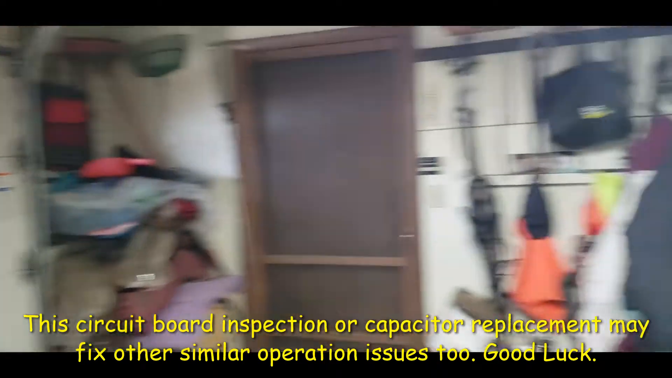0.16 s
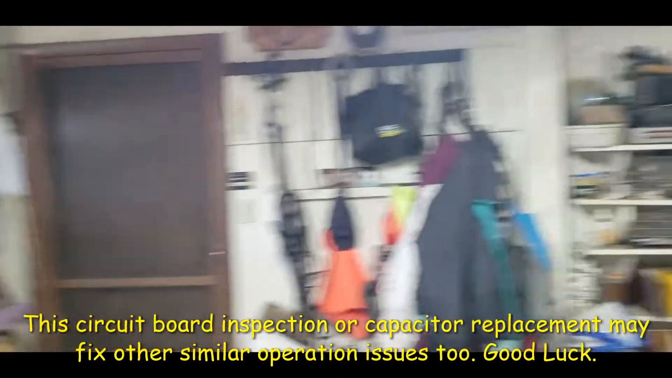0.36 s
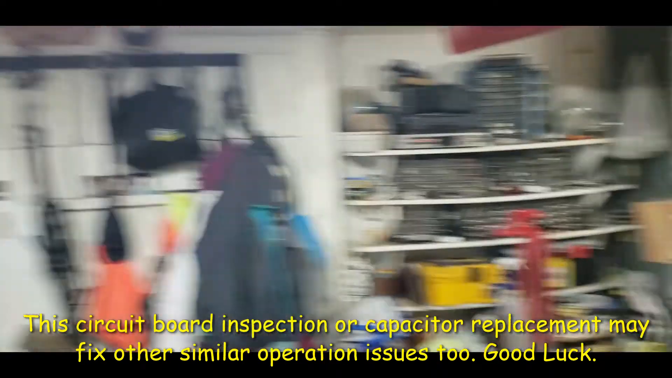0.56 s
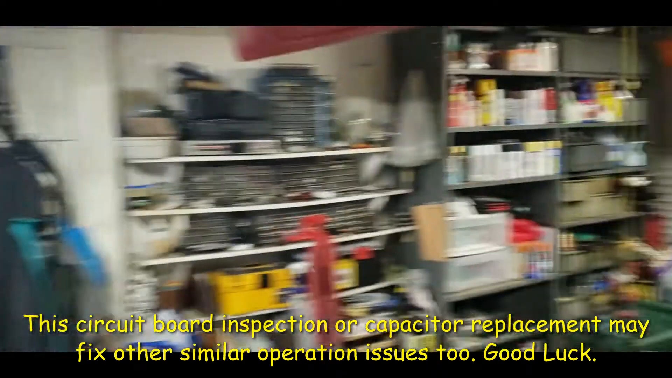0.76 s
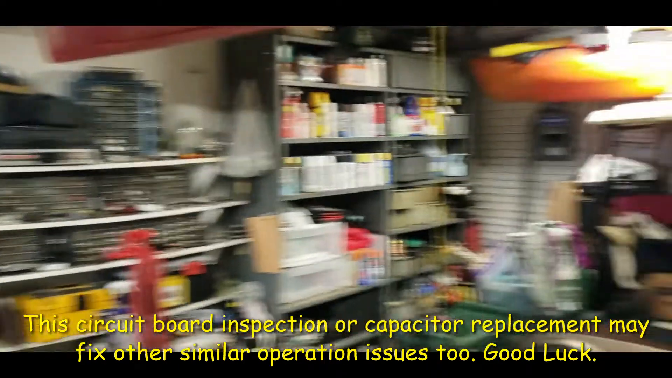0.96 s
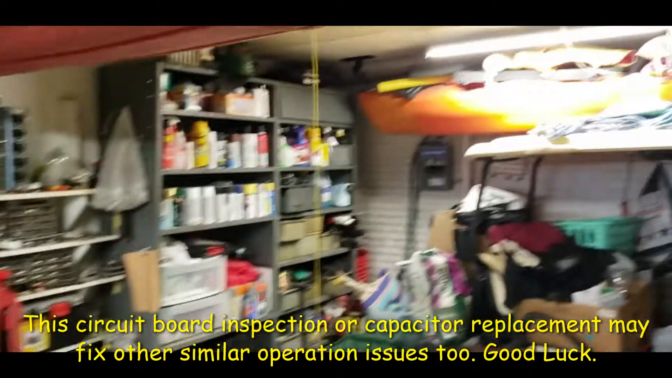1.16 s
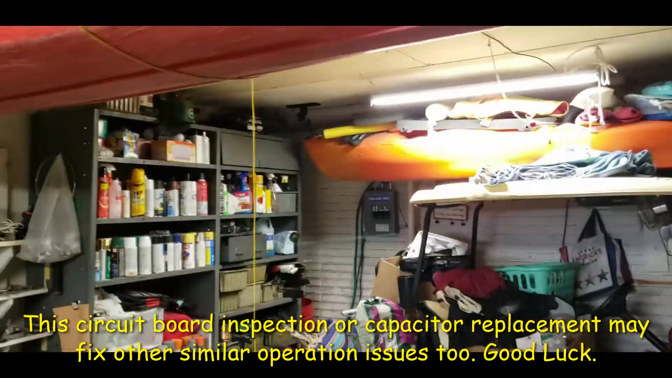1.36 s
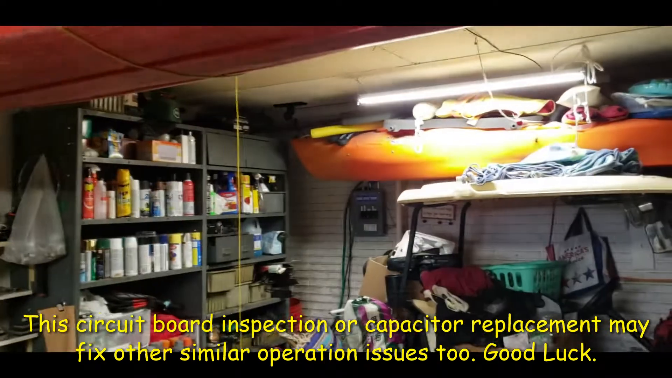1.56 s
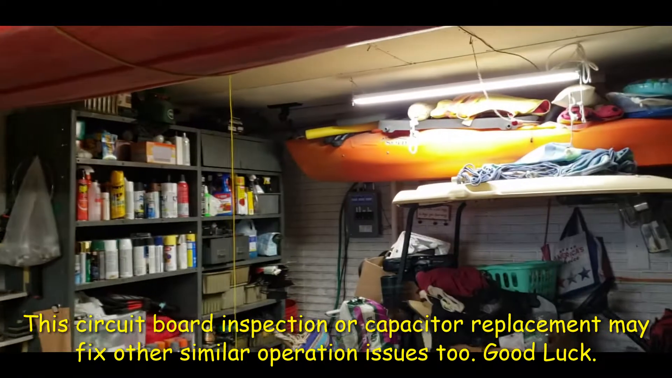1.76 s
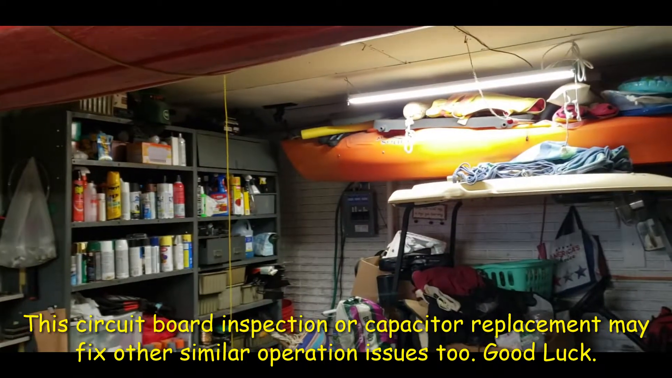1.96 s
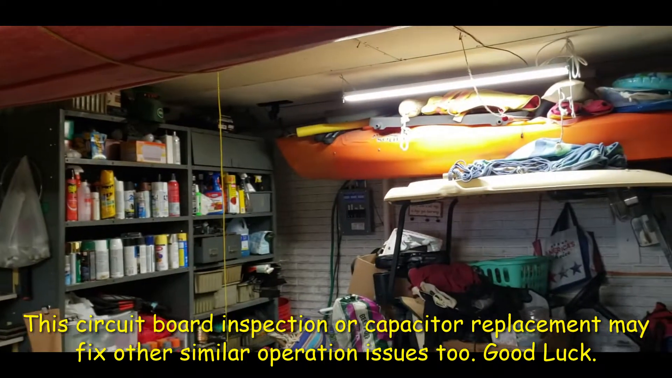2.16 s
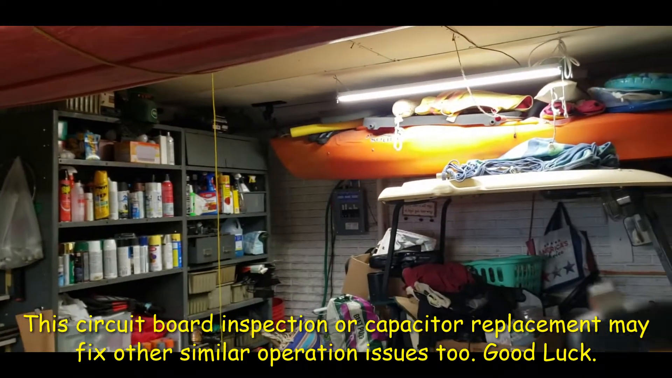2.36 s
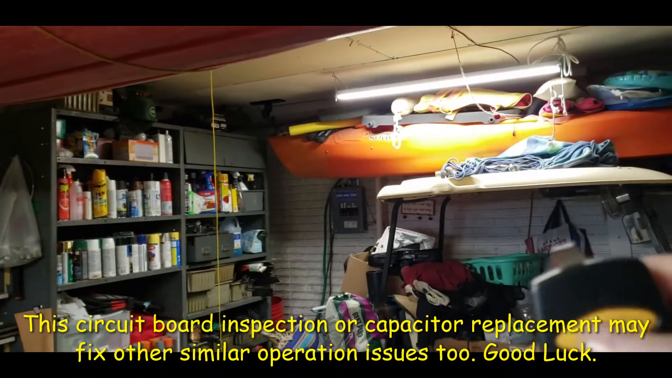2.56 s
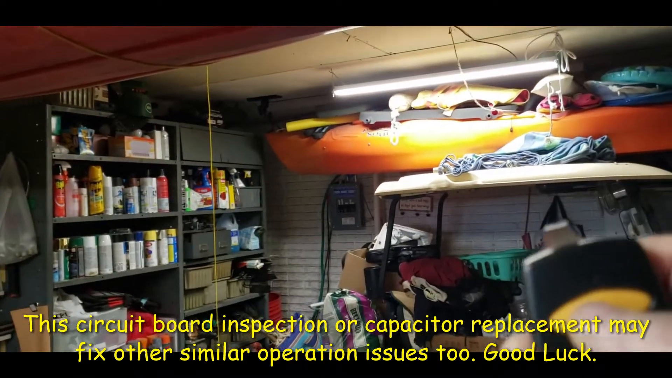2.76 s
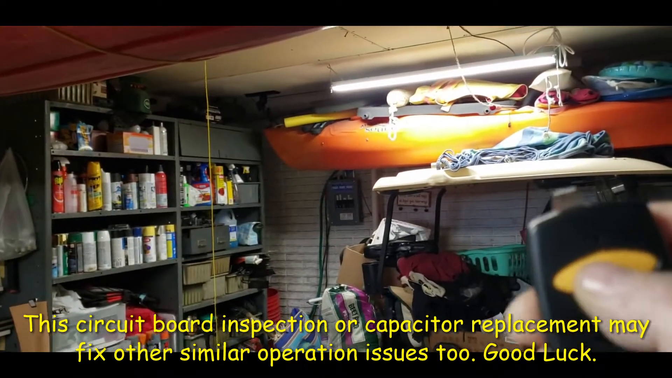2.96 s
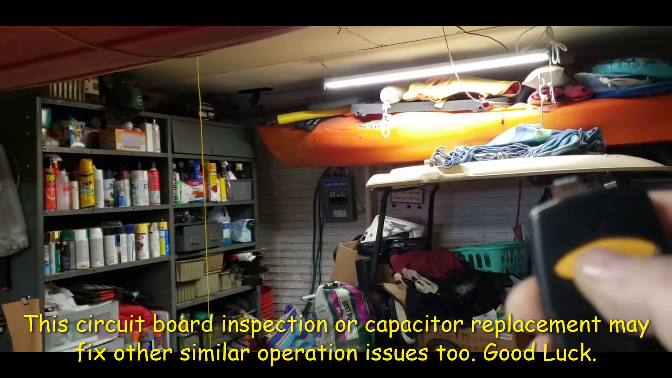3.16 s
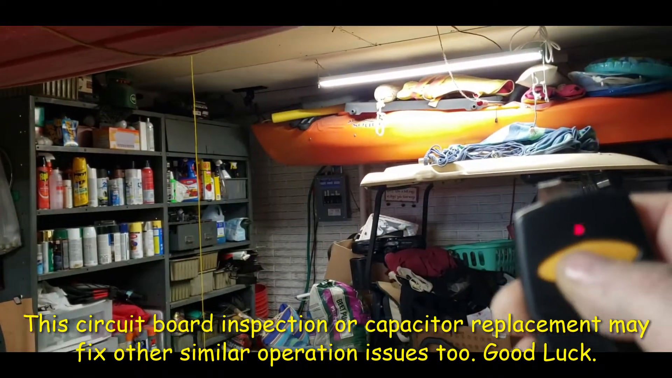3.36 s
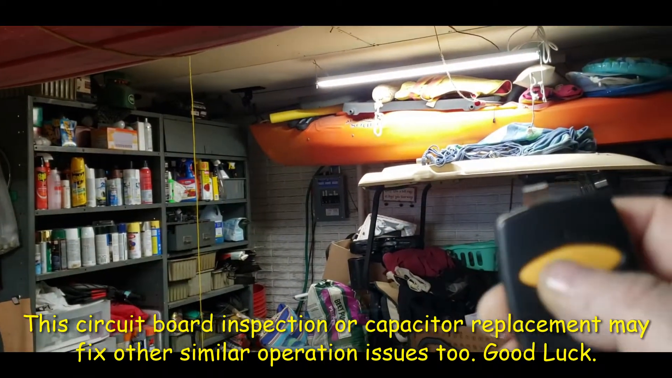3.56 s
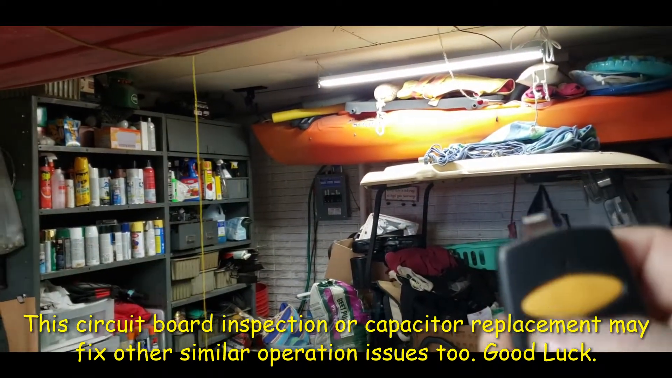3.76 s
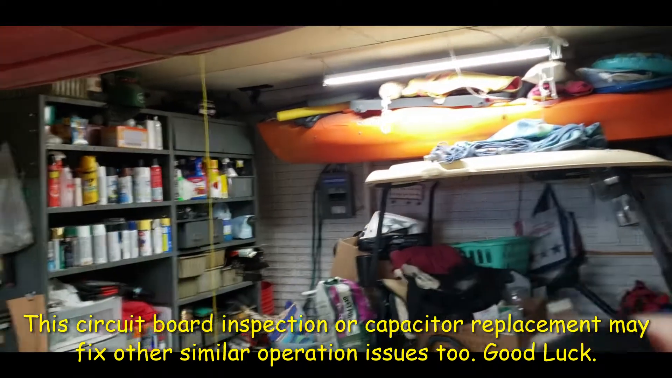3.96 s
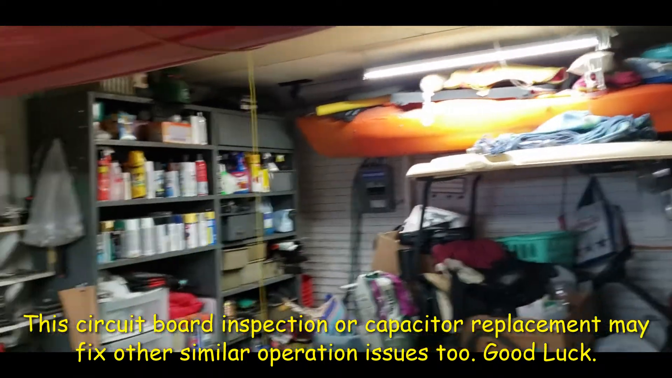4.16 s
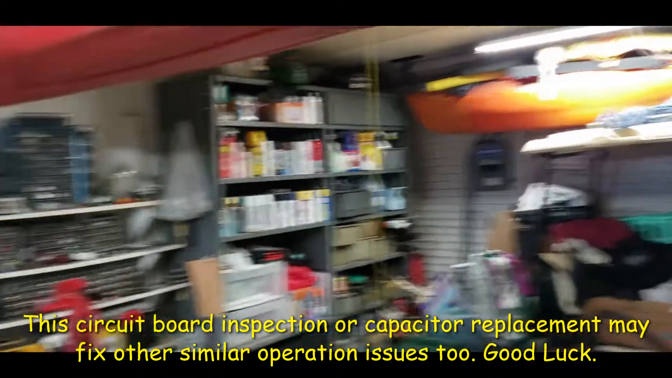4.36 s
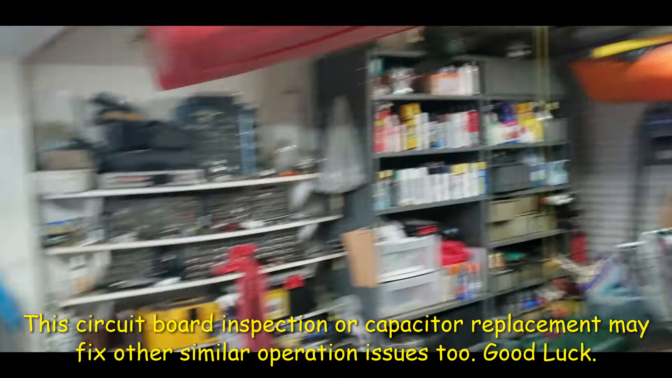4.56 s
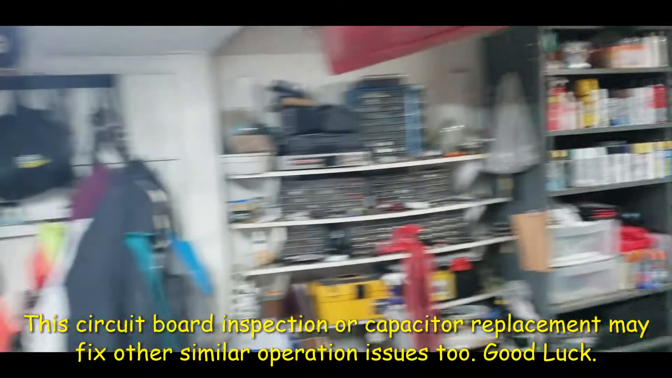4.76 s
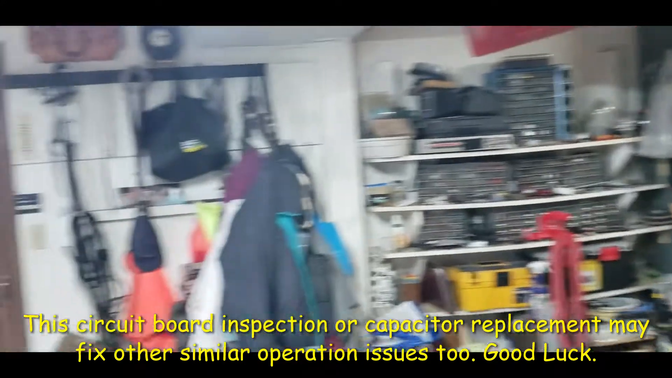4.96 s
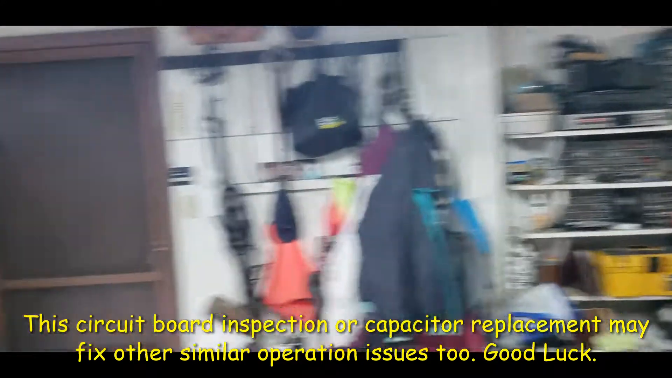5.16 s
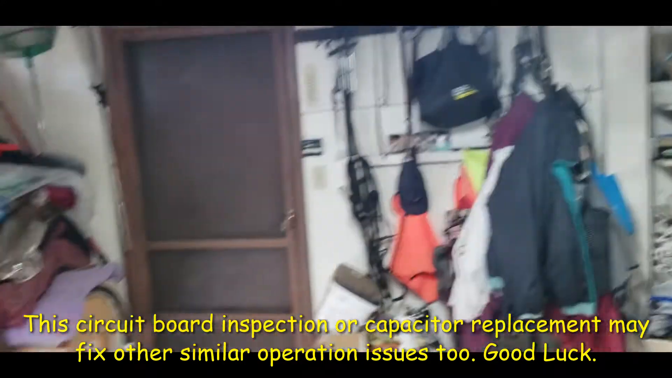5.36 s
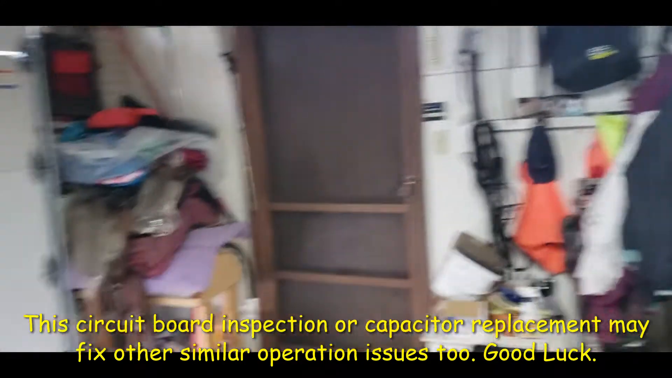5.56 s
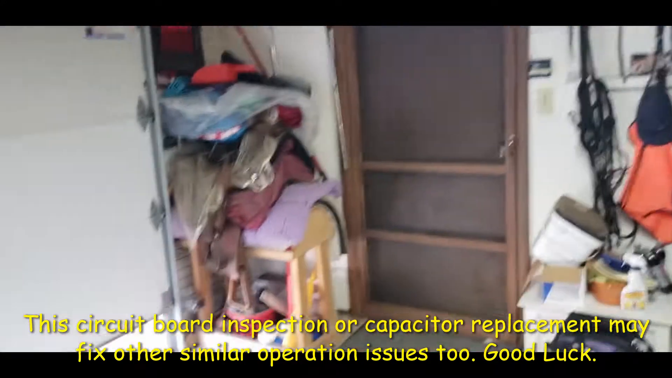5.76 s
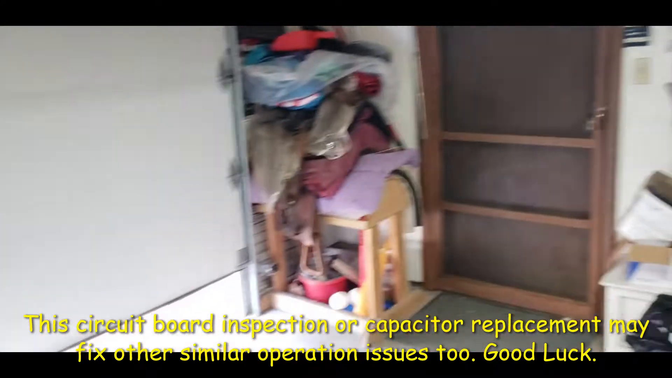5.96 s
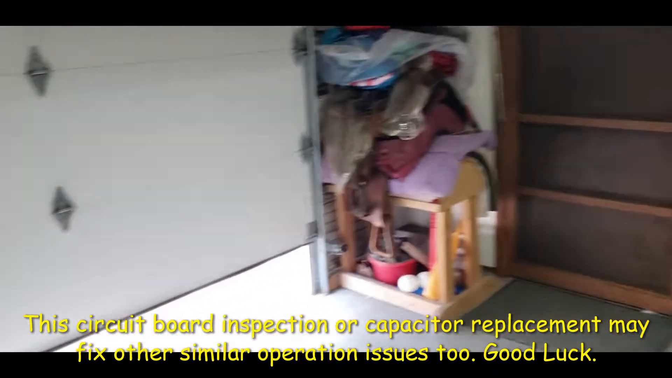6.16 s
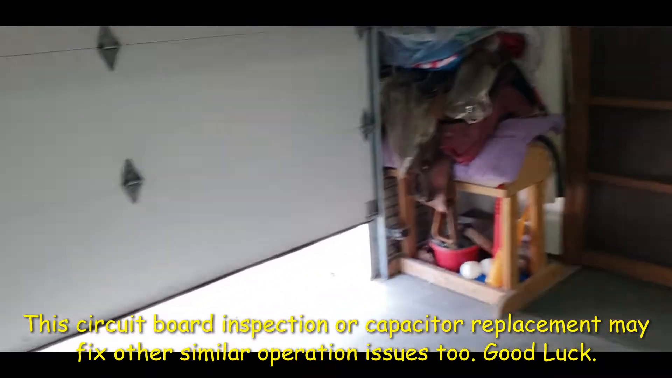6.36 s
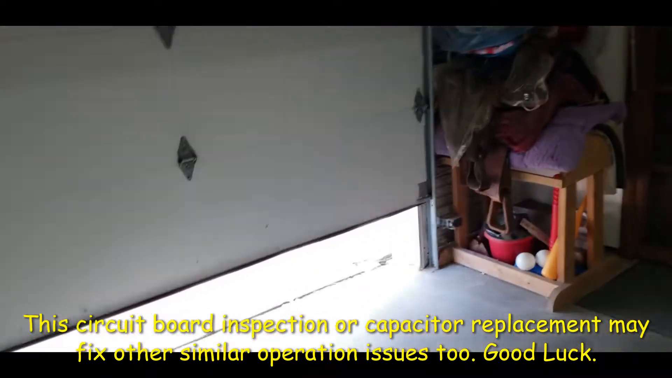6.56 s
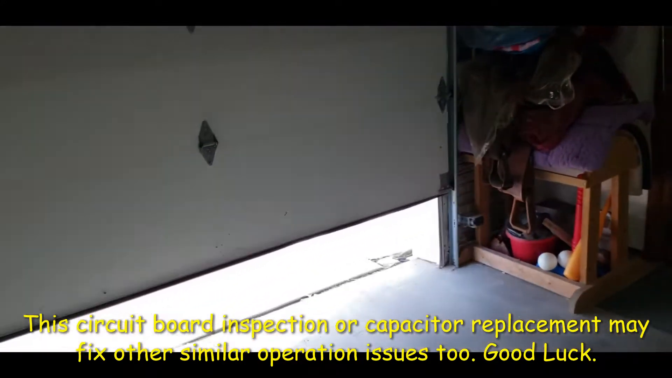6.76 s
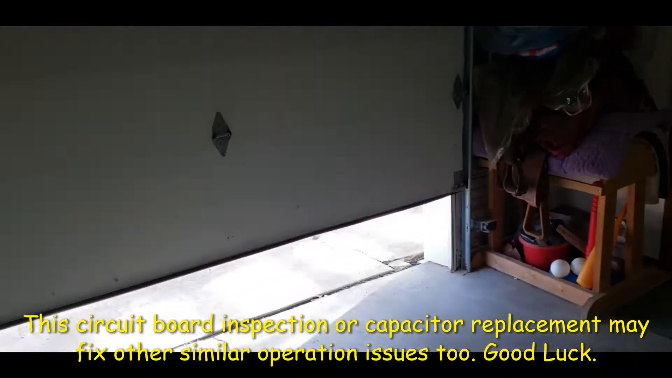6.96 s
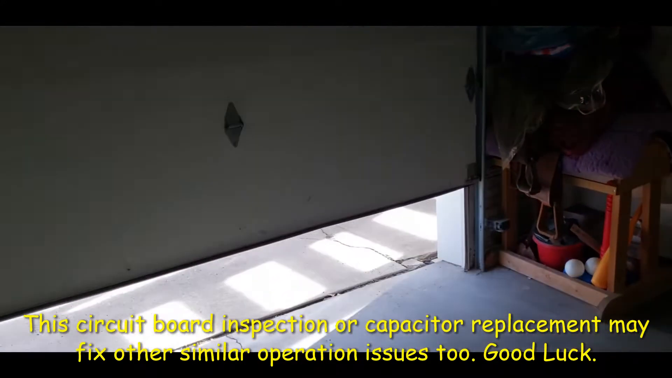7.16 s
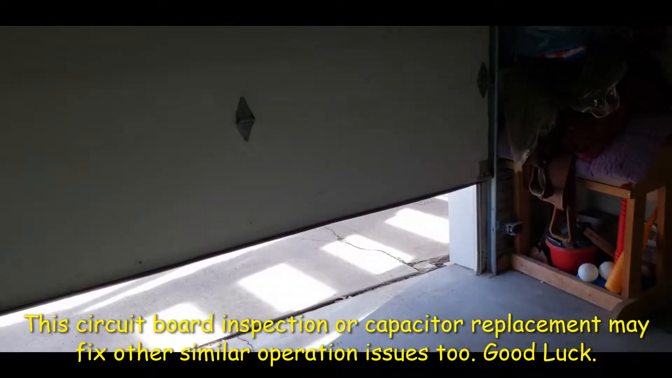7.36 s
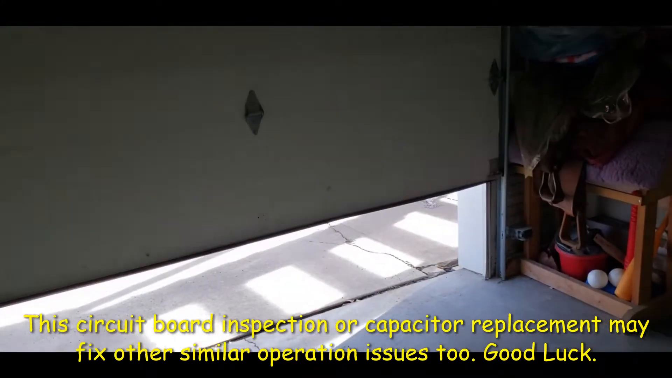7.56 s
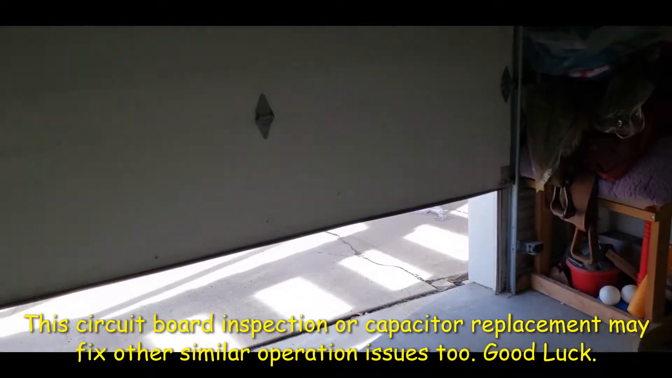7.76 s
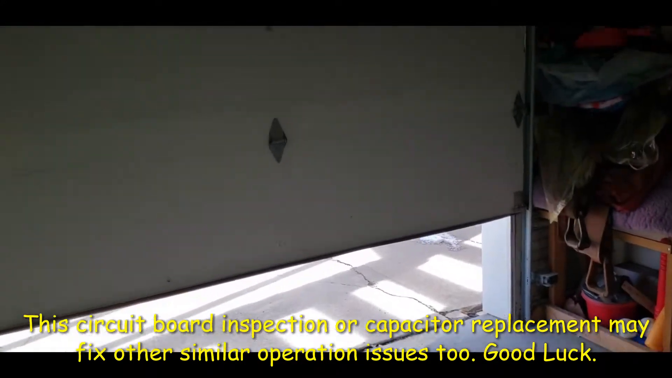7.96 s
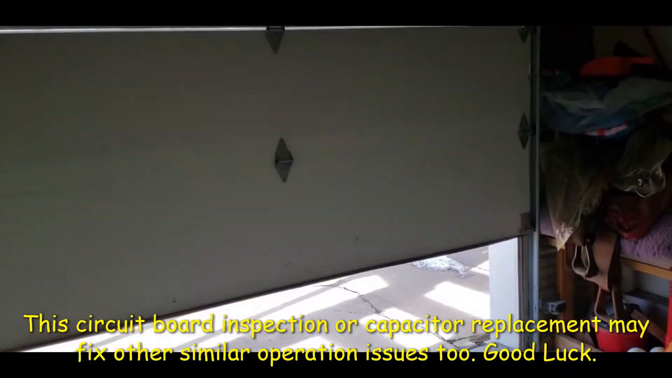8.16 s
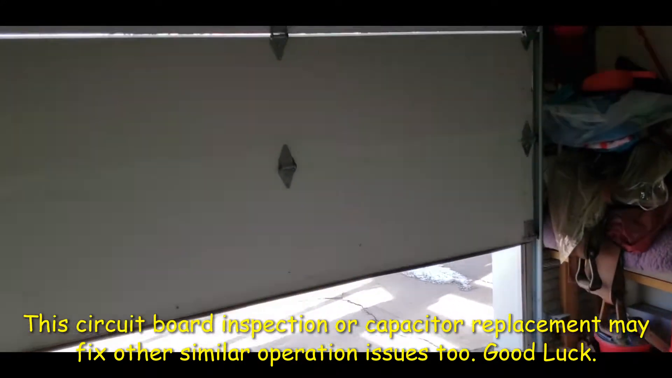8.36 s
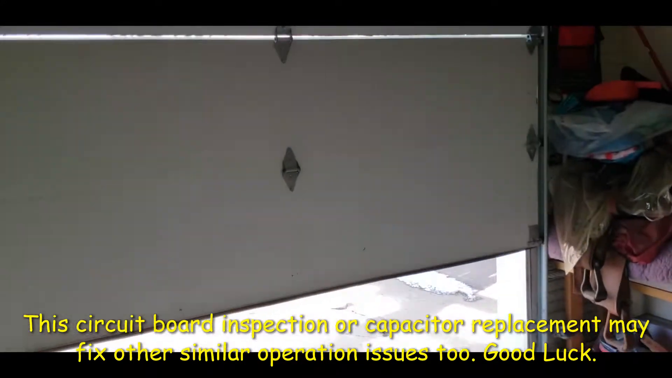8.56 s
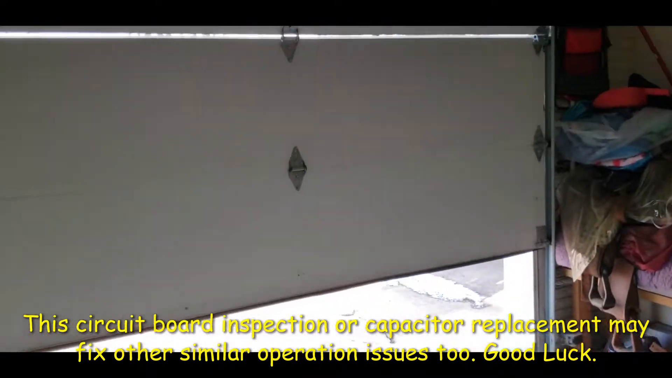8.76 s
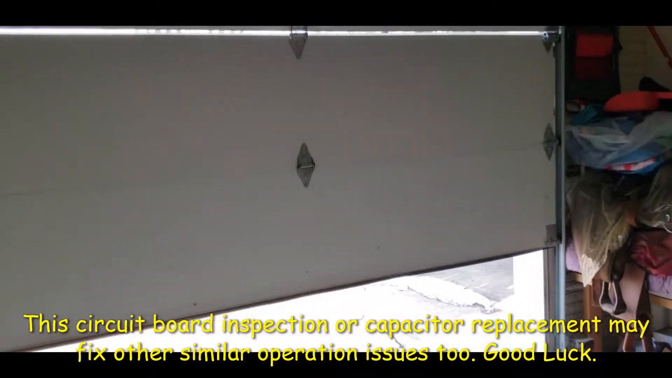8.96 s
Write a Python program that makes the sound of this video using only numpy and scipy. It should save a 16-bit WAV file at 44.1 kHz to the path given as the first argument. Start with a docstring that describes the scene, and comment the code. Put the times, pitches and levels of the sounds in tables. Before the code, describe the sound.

In a garage, feet shuffle, a button clicks, and a motor jolts a sectional door upward with steady humming, rolling, booming knocks and hinge jangles.

```python
"""Inside a garage with a concrete floor, under a chain-drive door opener; stereo from a hand-held phone.
Main source: the motor growls up and hums in beating partials; noise-driven rollers, chain and rail run.
Door and fittings: blows ring panels and hinges, a trolley slams, rollers squeak, the seal rasps.
Close by: shoes grind sand on the floor, fingers tap the phone and a remote's button clicks.
Background: still air, as coloured noise that reaches both microphone ports from all round."""
import sys
import numpy as np
from scipy import signal
from scipy.fft import rfft, irfft, next_fast_len
from scipy.io import wavfile
from scipy.ndimage import uniform_filter1d

SR = 44100
rng = np.random.default_rng(int(sys.argv[2]) if len(sys.argv) > 2 else 0)


def int16_out(signal):
    """Quantize to a 16-bit WAV file."""
    q = np.round(np.clip(np.atleast_2d(signal).T, -1, 1) * 32767)
    wavfile.write(sys.argv[1], SR, q.astype(np.int16))


N = 401217

# Levels in the tables are relative: the trims in each source and the microphone's colour act on them.
# Hum swelling and sinking as the phone moves through standing waves: start_s, first_partial_db, second_partial_db
HUM_LEVELS = [(3.45, -36.5, -48), (3.65, -34, -46.5), (4.1, -39.5, -40.5), (4.67, -33.5, -46),
              (5.05, -49, -42), (5.27, -57, -40), (5.45, -33, -35), (5.68, -41.5, -52), (6.1, -35.5, -45.5),
              (6.3, -35.5, -32.5), (6.55, -29.5, -32), (6.83, -32, -35), (6.95, -30, -27), (7.05, -43, -34),
              (7.16, -36, -46), (7.28, -48, -54), (7.5, -32.5, -45.5), (7.78, -31, -37),
              (8.15, -28.5, -34.5), (8.28, -33, -46.5), (8.45, -30.5, -47), (8.62, -38.5, -41),
              (9.0, -34.5, -49.5), (9.1, -36, -55)]
# The hum's third partial: start_s, level_db
THIRD_PARTIAL = [(3.65, -48), (4.3, -49.5), (4.7, -46.5), (5.4, -50), (6.5, -42.5), (6.9, -51),
                 (7.9, -46.5), (8.6, -49), (9.1, -56.5)]
# Weak upper partials of the hum: multiple_of_hum, level_db
UPPER_PARTIALS = [(4, -10.5), (5, -22), (6, -10), (7, -28), (10, -36), (12, -24.5), (16, -25)]
# Growl of the straining motor: pitch_hz, level_db_per_hz
GROWL_SPECTRUM = [(60, -2.5), (120, 10), (380, 2), (700, -14), (900, -30), (1300, -26.5)]
# Friction in the tracks, greatest as sections bend over the curve: start_s, scraping_db, rolling_db
FRICTION_LEVELS = [(3.75, -51.5, -49), (4.0, -57, -53.5), (4.34, -53, -51), (4.84, -58, -51.5),
                   (5.21, -53.5, -55.5), (5.54, -53.5, -49), (6.03, -51.5, -51), (6.25, -53, -48.5),
                   (6.74, -49, -46), (6.94, -49, -47.5), (7.17, -56.5, -59), (7.32, -52.5, -46),
                   (7.71, -45, -45), (8.04, -51.5, -45), (8.2, -50, -48), (8.33, -56.5, -47.5),
                   (8.62, -54.5, -46), (8.96, -54.5, -48.5), (9.1, -51.5, -56)]
# Drift of the door to the right as the phone turns: start_s, left_minus_right_db
FACING_BALANCE = [(3.5, 1.8), (5.3, 0), (6.3, -1.5), (7.3, -0.7), (7.9, -2)]
# Rumble of the door panels: pitch_hz, level_db_per_hz
RUMBLE_SPECTRUM = [(20, -28), (35, -11), (50, -3.5), (75, -7.5), (100, -3), (150, -1.5), (200, -8),
                   (290, -7), (400, -16), (600, -37.5), (1200, -56)]
# Rolling of the rollers: pitch_hz, level_db_per_hz
ROLLER_SPECTRUM = [(200, -19), (400, -3), (520, -4), (720, -1), (850, -1), (1100, -6.5), (1600, -9.5),
                   (3000, -46.5)]
# Scraping in the track: pitch_hz, level_db_per_hz
SCRAPE_SPECTRUM = [(700, -22.5), (1200, 0.5), (1700, 3), (2400, -2.5), (3700, 2.5), (4700, -3), (6500, -9),
                   (8000, -21), (12000, -43)]
# Hiss of the chain: pitch_hz, level_db_per_hz
CHAIN_SPECTRUM = [(3000, -35), (6000, -6.5), (8000, -16), (10000, -2.5), (12000, -1.5), (14000, -6.5),
                  (16000, -13.5)]
# Resonances of rail and tracks: pitch_hz, level_db, t60_s
RAIL_MODES = [(447, -1, 0.057), (594, 8, 0.054), (816, 9, 0.53), (1261, 7, 0.13), (1404, 11, 0.15),
              (2000, -19, 0.079), (2555, 5.5, .1), (2790, 13, 0.17), (3060, 10, 0.11), (3620, 7, 0.07),
              (3750, -24, 0.15), (4000, 1, 0.14), (6400, 5.5, 0.078), (6660, -8, 0.065)]
# Resonances in which the loaded rollers grind: pitch_hz, level_db, t60_s
GRIND_MODES = [(585, -7.5, 0.065), (696, -0.5, 0.068), (816, -13, 0.057)]
# Blows of the door sections: start_s, panel_boom_db, hinge_jangle_db, steel_edge_db, thud_db
DOOR_BLOWS = [(3.479, -40, -32.5, -60, -31), (3.5037, -48, -31, -37.5, -38), (3.525, -37, -25, -39, -37),
              (3.5503, -30, -23.5, -22.5, -36), (3.572, -36, -26.5, -35, -36),
              (3.902, -60, -36.5, -36.5, -46), (4.165, -65, -42.5, -52.5, -41.5),
              (4.561, -43, -46.5, -56, -41), (4.725, -52, -42.5, -59.5, -48), (4.838, -38, -24, -34, -50),
              (4.847, -20, -23, -33, -46), (4.8797, -25.5, -26, -58, -44), (4.9495, -25, -33, -69, -33),
              (5.19, -55, -42, -51, -50), (5.38, -21, -24, -33, -32), (6.013, -43, -39, -54, -39),
              (6.563, -47, -52, -52, -44), (6.689, -34, -47, -72, -34), (6.8664, -26, -45, -68, -32),
              (7.094, -23, -28, -38.5, -42), (7.11, -23, -30.5, -45, -42), (7.1383, -23.5, -29, -59, -27),
              (7.2161, -33, -54, -50, -35), (7.315, -29.5, -39, -55, -53), (7.376, -34.5, -41, -55, -49),
              (7.4605, -30.5, -35.5, -45, -54), (8.408, -49, -35, -57, -55), (8.452, -51, -45.5, -53, -53),
              (8.519, -49, -46, -59, -54), (8.785, -54.5, -41.5, -64, -57.5), (8.881, -47, -43, -68, -50)]
# Resonances of the door panels: pitch_hz, level_db, t60_s
PANEL_MODES = [(63, -24, 0.12), (139.2, -2.5, 0.66), (167, 5, 0.31), (185, -3, 0.37), (207, -11, 0.13),
               (350, -16, 0.1), (450, -28, 0.15)]
# Heave of a whole heavy body, door or floor: pitch_hz, level_db_per_hz
HEAVE_SPECTRUM = [(25, -11), (48, 9), (75, 4), (110, -7), (250, -46.5)]
# Clatter of shaken rollers: pitch_hz, level_db_per_hz
CLATTER_SPECTRUM = [(150, -15.5), (350, 5), (520, -2.5), (750, 6.5), (1100, -7.5), (1600, -2),
                    (3000, -27.5)]
# Jangle of loose hinges: pitch_hz, level_db_per_hz
JANGLE_SPECTRUM = [(800, -6), (1400, -6), (1900, -1), (2400, -2.5), (2900, -3), (4000, -5.5), (5500, -16.5),
                   (7000, -18), (8200, -29), (14000, -55)]
# Bright edge of struck steel: pitch_hz, level_db_per_hz
STEEL_SPECTRUM = [(2000, -6.5), (4500, 9), (7000, 2.5), (8100, -2.5), (10000, 4.5), (12000, 8), (14000, 2),
                  (16000, -8)]
# Steel of the trolley: pitch_hz, level_db, t60_s
TROLLEY_MODES = [(960, 4.5, 0.03), (1420, -6.5, 0.027), (2202, -17, 0.064), (2740, 0, 0.069),
                 (2930, 2, 0.04), (3220, 9, 0.027), (3480, -1, 0.05), (3758, 0, 0.06), (4150, 3, 0.051)]
# Sharp ticks of hinges and spring: start_s, level_db
TICK_EVENTS = [(7.377, -52), (7.503, -40.5), (7.575, -40), (7.606, -36.5), (7.65, -42), (7.72, -41.5)]
# Snap of a tick: pitch_hz, level_db_per_hz
SNAP_SPECTRUM = [(2000, -16), (3800, 6), (5500, 4), (7000, -3), (8100, -2.5), (10500, 7.5), (12500, 8.5),
                 (14500, -1), (16000, -11)]
# Creaks of dry rollers in the track: middle_s, pitch_hz, level_db, length_s
SQUEAK_EVENTS = [(3.503, 2010, -36, 0.006), (5.527, 1560, -52.5, 0.24), (5.751, 3120, -52, 0.034),
                 (5.759, 1555, -49.5, 0.055), (6.215, 3280, -51, 0.043), (6.216, 1215, -51, 0.066),
                 (7.336, 720, -40.5, 0.035), (7.337, 1180, -47, 0.035), (8.119, 707, -39, 0.052),
                 (8.521, 3500, -52, .02), (8.529, 2230, -44.5, 0.029), (8.631, 1960, -51, 0.076),
                 (8.709, 2860, -49.5, 0.076), (8.89, 1020, -50, 0.037), (8.885, 2220, -45, 0.029),
                 (8.878, 3020, -53, 0.047)]
# Door edge rubbing its seal: pitch_hz, level_db_per_hz
RUB_SPECTRUM = [(1500, -26), (2500, -9), (3500, 6), (4200, -4), (5500, -14), (8000, -38)]
# Shoe pivoting on the concrete: start_s, length_s, scuff_db, grit_db
PIVOT_EVENTS = [(0.0, 0.21, -45.5, -62), (0.131, 0.047, -33.5, -53), (0.349, 0.14, -36, -52)]
# Sole catching the floor: start_s, scuff_db, thud_db, grit_db
STEP_EVENTS = [(0.06, -47.5, -54, -56.5), (0.138, -24.5, -31, -69), (0.174, -22, -55, -47),
               (0.359, -22.5, -28, -32), (0.524, -28, -37, -61)]
# Sole on concrete: pitch_hz, level_db_per_hz
SCUFF_SPECTRUM = [(100, 5), (200, 5.5), (400, 0), (560, -5), (850, 2.5), (1150, -1), (1800, -5.5),
                  (3500, -6.5), (5500, -12), (8000, -25.5), (14000, -39)]
# Sand under the sole: pitch_hz, level_db_per_hz
GRIT_SPECTRUM = [(3000, -28), (6000, 5), (8000, 3.5), (11000, 18), (14000, 14), (16000, -2)]
# Fingers on the phone's case: start_s, peak_db, contact_s, left_minus_right_db
FINGER_TAPS = [(0.636, -33, 0.00039, 16), (0.692, -47, 0.00052, 6), (1.150, -32.5, 0.0001, 13.5),
               (1.226, -37.5, 0.00074, 15), (1.366, -60, 0.00065, 10)]
# Resonances of the phone's case: pitch_hz, level_db, t60_s
CASE_MODES = [(463, -12, 0.03), (616, -3, 0.018), (735, 2, 0.014), (865, -1, 0.016), (1080, -9, 0.011),
              (1600, -13, 0.008), (2900, -10, 0.0033)]
# Remote's button, pressed and let go: start_s, peak_db, contact_s (at least one sample), left_minus_right_db
BUTTON_CLICKS = [(3.071, -18, 0.000016, 0.5), (3.471, -25, 0.00022, -1.5)]
# Resonances of the remote: pitch_hz, level_db, t60_s
REMOTE_MODES = [(1670, 0, 0.022), (1850, 1.5, 0.023), (2990, 2, 0.016), (3980, 1, 0.016), (5400, 6, 0.0045),
                (6700, 11, 0.003), (10500, 6, 0.0033)]
# Still air: pitch_hz, level_db_per_hz
AIR_SPECTRUM = [(20, -15), (45, -2.5), (78, -1), (115, -10), (250, -19), (600, -25), (1500, -28),
                (4000, -27), (8000, -40), (12000, -27), (16000, -30)]
# Difference in colour of the two microphone ports: pitch_hz, left_minus_right_db
PORT_COLOURS = [(60, 4.5), (130, 0), (380, 2), (700, 3), (1300, 4), (2400, 6.5), (4400, 4.5), (8100, -7.5),
                (12000, -10), (15000, -17)]

HUM_HZ = 120.6
# The rotor lags the mains field, so the hum throbs: rate, time of one crest, rotor tone before trims
BEAT_HZ, BEAT_CREST_S, ROTOR_DB = 3.99, 3.68, -48
# The motor switches on and takes up the door's weight
START_S, SPIN_UP_S = 3.41, 0.12
RELAY_S, RELAY_DB, RELAY_T60_S = 3.397, -63, 0.5
GROWL_S, GROWL_LENGTH_S, GROWL_DB, GROWL_T60_S = 3.404, 0.2, -41, 0.56
EASY_RUN_DB = -51  # friction at which the running noises have their stated levels
RATTLE_PEAK_S = 0.0081  # loose parts rattle hardest this long after a blow
BLOW_ROOM_T60_S = 0.34
SLAM_S, SLAM_DB = 3.5535, -22  # level of the loudest 20 ms
SQUEAK_WAVER = 0.035  # typical share by which a squeak's pitch wanders
RUB_S, RUB_ATTACK_S, RUB_LENGTH_S, RUB_T60_S, RUB_DB = 7.45, 0.15, 0.72, 0.9, -51
PIVOT_ATTACK_S, PIVOT_T60_S = 0.004, 0.65
# The body's weight shifts and the floor rumbles
SHIFT_S, SHIFT_LENGTH_S, SHIFT_DB, SHIFT_T60_S = 0.088, 0.36, -37.5, 0.99
SOLE_S, SOLE_LENGTH_S, SOLE_HZ, SOLE_DB = 0.063, 0.045, 480, -42.5
AIR_DB = -68.7
PORT_GAP_M, TOP_HZ = 0.17, 15900


def motor(wobble=0.44, buzz_wobble=1.2, hum_db=-1, third_db=1.5, buzz_db=-47,
          flutter_db=1.5, sway_db=1.0, rotor_fall_db=3):
    """Hum at twice the mains rate beats with the rotor; the shaking housing makes every partial waver."""
    t = np.arange(N) / SR
    phase = 2 * np.pi * HUM_HZ * t
    slip = 2 * np.pi * BEAT_HZ * (t - BEAT_CREST_S)
    levels = curves(HUM_LEVELS) + [curves(THIRD_PARTIAL)[0] + third_db]
    out = np.zeros((2, N))
    for k, db in enumerate(levels, 1):
        partial = phase * k + wobble * np.sqrt(k) * walk(19) + rng.uniform(0, 2 * np.pi)
        lag = 0.18 * k * walk(1.613) * np.array([[1], [-1]])  # the phone turns in the sound field
        flutter = flutter_db * np.sqrt(k) * (walk(24) + walk(9))
        out += amp(db + flutter) * np.sin(partial + lag)
        out += amp(ROTOR_DB - rotor_fall_db * (k - 1) ** 2) * np.sin(partial + lag - slip)
    for k, db in UPPER_PARTIALS:
        drift = buzz_wobble * (walk(17) + np.array([walk(1.954), walk(1.524)]))
        out += amp(buzz_db + db + sway_db * walk(8.1)) * np.sin(round(k) * phase + drift)
    return np.sqrt(2) * amp(hum_db) * drive() * out


def start_up(attack_s=0.03, throb=0.41):
    """The relay splashes faintly in echoes; the straining motor shakes its housing at the hum's rate."""
    t = np.arange(N) / SR
    relay = diffuse(N) * swell(RELAY_S, 0.0042, 0.01, RELAY_T60_S)
    growl = unit(colour(diffuse(N), GROWL_SPECTRUM)) * (1 + throb * np.sin(2 * np.pi * HUM_HZ * t))
    growl = amp(GROWL_DB) * swell(GROWL_S, attack_s, GROWL_LENGTH_S, GROWL_T60_S) * growl
    return burst(colour(relay, STEEL_SPECTRUM), RELAY_DB) + growl


def drive():
    """The motor's ramp from rest (0) to full strength (1)."""
    return np.clip((np.arange(N) / SR - START_S) / SPIN_UP_S, 0, 1)


def running(rumble_db=-40.5, roller_db=-49.5, scrape_db=-49.5, chain_db=-56.5, rail_db=-57.5,
            link_hz=110, link_db=-6, shake_db=2.0, rumble_follow=0.43, chain_follow=1.1, uneven_db=1.16):
    """Panels rumble, rollers roll and scrape, chain links patter and ring the rail; all grow with friction."""
    strain, load = np.array(curves(FRICTION_LEVELS)) - EASY_RUN_DB + uneven_db * walk(7.9)
    clicks = (rng.random(N) < link_hz / SR) * rng.standard_normal(N)
    links = unit(room(clicks, 0.13, direct_db=-32))
    roll, grind, hiss = (unit(amp(shake_db * walk(35)) * diffuse(N) + amp(link_db) * links)
                         for _ in range(3))
    rail = convolve(grind, ring(RAIL_MODES, np.arange(SR // 3) / SR))
    scrape = amp(scrape_db) * unit(colour(grind, SCRAPE_SPECTRUM))
    rumble_level = amp(rumble_db + rumble_follow * load + 1.67 * walk(16))
    out = rumble_level * unit(colour(diffuse(N), RUMBLE_SPECTRUM))
    out += amp(roller_db + load) * unit(colour(roll, ROLLER_SPECTRUM))
    out += amp(strain) * (scrape + amp(rail_db) * unit(rail))
    out += amp(chain_db + chain_follow * strain) * unit(colour(hiss, CHAIN_SPECTRUM))
    return drive() * out


def grinding(slip_hz=130, grind_db=-55, surge_db=1.0):
    """Uneven roller slips ring the track; each resonance surges on its own as the load shifts."""
    slips = room((rng.random(N) < slip_hz / SR) * rng.standard_normal(N), 0.11, direct_db=-2)
    t = np.arange(SR // 4) / SR
    tones = np.zeros((2, N))
    for mode in GRIND_MODES:
        tone = unit(convolve(slips, ring([mode], t)))
        tones += amp(mode[1] + surge_db * walk(11)) * tone
    return amp(grind_db + curves(FRICTION_LEVELS)[1] - EASY_RUN_DB) * drive() * unit(tones)


def knocks(bounce_hz=700, bounce_db=-3, blow_db=3, thud_db=-3, boom_db=-1, clatter_db=-9,
           jangle_db=-10, steel_db=-4, rail_db=-19):
    """Each blow heaves the whole door, booms in the panels and sets loose hinges and rollers rattling."""
    out, t = np.zeros((2, N)), np.arange(int(.5 * SR)) / SR
    age = t / RATTLE_PEAK_S
    for s, boom, jangle, steel, thud in DOOR_BLOWS:
        bounces = (rng.random(len(t)) < bounce_hz / SR) * rng.uniform(-1.02, 1, len(t))
        force = amp(bounce_db) * bounces * age * np.exp(1 - age)  # the rattle spreads, then settles
        force[0] = amp(blow_db)
        heave = colour(diffuse(len(t)) * fade(t, 1.0), HEAVE_SPECTRUM)
        panel = signal.fftconvolve(force, ring(PANEL_MODES, t))[:len(t)]
        rail = signal.fftconvolve(force, ring(RAIL_MODES, t))[:len(t)]
        metal = room(force, BLOW_ROOM_T60_S, direct_db=-21.0)
        edge = room(force, 0.26, direct_db=-23)
        roller_db = (boom + jangle) / 2 + clatter_db  # shaken by panel and hinge alike
        add(out, burst(heave, thud + thud_db), s)
        add(out, burst(room(panel, 0.24, direct_db=0), boom + boom_db), s)
        add(out, burst(colour(metal, CLATTER_SPECTRUM), roller_db), s)
        add(out, burst(colour(metal, JANGLE_SPECTRUM), jangle + jangle_db), s)
        add(out, burst(room(rail, 0.12, direct_db=-21), jangle + rail_db), s)
        add(out, burst(colour(edge, STEEL_SPECTRUM), steel + steel_db), s)
    return out


def slam(crack_s=0.02, crack_db=-6, echo_t60=0.2):
    """The slack chain snaps the trolley against the door arm: a steel crack, a ring, a short echo."""
    t = np.arange(SR // 2) / SR
    crack = colour(rng.standard_normal(len(t)) * fade(t, crack_s), STEEL_SPECTRUM)
    blow = ring(TROLLEY_MODES, t) + amp(crack_db) * crack
    out = np.zeros((2, N))
    add(out, burst(room(blow, echo_t60, direct_db=1.5), SLAM_DB), SLAM_S)
    return out


def rattles(rate_hz=16, scatter_db=4.0, rattle_db=-55, edge_db=-11):
    """Loose hinges and rollers chatter at uneven moments, harder with more friction."""
    blows = (rng.random(N) < rate_hz / SR) * amp(scatter_db * rng.uniform(-1.8, 1, N))
    metal = unit(room(blows, 0.12, direct_db=-20.0))
    chatter = unit(colour(metal, JANGLE_SPECTRUM)) + amp(edge_db) * unit(colour(metal, STEEL_SPECTRUM))
    return amp(rattle_db + curves(FRICTION_LEVELS)[0] - EASY_RUN_DB) * drive() * chatter


def squeaks(slip_hz=500, ring_s=0.03, rasp_db=-13):
    """A roller sticks and slips; each slip rasps and rings its stem, whose pitch wavers with the load."""
    out, t = np.zeros((2, N)), np.arange(SR // 2) / SR
    stretch = 1 + SQUEAK_WAVER * walk(35)
    for s, hz, db, length_s in SQUEAK_EVENTS:
        slips = (rng.random(len(t)) < slip_hz / SR) * np.sin(np.pi * np.minimum(t / length_s, 1))
        slips[int(length_s / 2 * SR)] = 1  # the roller breaks free at the height of the strain
        local_stretch = np.roll(stretch, -int(s * SR))[:len(t)]
        turn = np.exp(2j * np.pi * hz * np.cumsum(local_stretch) / SR)
        decay = fade(t, ring_s * 2000 / hz)  # low notes ring longer
        # filtered in a frame that turns with the pitch, so the ringing follows the waver
        creak = unit(np.real(turn * signal.fftconvolve(slips / turn, decay)[:len(t)]))
        creak += amp(rasp_db) * unit(highpass(colour(slips, JANGLE_SPECTRUM), hz / 2))
        add(out, burst(room(creak, 0.46, direct_db=0.0), db), s - length_s / 2)
    return out


def ticks(ring_s=0.019, jangle_db=-3, pan_db=-3):
    """Steel slips under load with a short bright snap that jangles the hinge."""
    out, t = np.zeros((2, N)), np.arange(SR // 4) / SR
    for s, db in TICK_EVENTS:
        edge, hinge = rng.standard_normal((2, len(t))) * fade(t, ring_s)
        snap = colour(edge, SNAP_SPECTRUM) + amp(jangle_db) * colour(hinge, JANGLE_SPECTRUM)
        add(out, burst(room(snap, 0.16, direct_db=-6.5), db), s)
    return pan(pan_db) * out


def seal_rub(flutter_db=1.2):
    """A dry, even rasp while the door's edge slides along the seal as it lifts."""
    rasp = unit(colour(diffuse(N), RUB_SPECTRUM)) * amp(flutter_db * walk(25))
    return amp(RUB_DB) * swell(RUB_S, RUB_ATTACK_S, RUB_LENGTH_S, RUB_T60_S) * rasp


def shuffle(thud_db=-3, scuff_db=-13, grit_db=-2, drag_db=-2, grain_hz=1500, judder_db=2.0):
    """Soles drag sand grains over concrete and catch now and then with a dull thud."""
    grains = (rng.random(N) < grain_hz / SR) * rng.standard_normal(N) * amp(judder_db * walk(69.9))
    sand = unit(room(grains, 0.21, direct_db=-5))
    sole, grit_noise = unit(colour(sand, SCUFF_SPECTRUM)), unit(colour(sand, GRIT_SPECTRUM))
    shift = swell(SHIFT_S, PIVOT_ATTACK_S, SHIFT_LENGTH_S, SHIFT_T60_S)
    out = amp(SHIFT_DB) * shift * unit(colour(diffuse(N), HEAVE_SPECTRUM))
    for s, length_s, scuff, grit in PIVOT_EVENTS:
        drag = amp(drag_db) * swell(s, PIVOT_ATTACK_S, length_s, PIVOT_T60_S)
        out += drag * (amp(scuff) * sole + amp(grit) * grit_noise)
    t = np.arange(SR // 2) / SR
    for s, scuff, thud, grit in STEP_EVENTS:
        catch = diffuse(len(t)) * fade(t, 0.33)
        add(out, burst(colour(catch, HEAVE_SPECTRUM), thud + thud_db), s)
        add(out, burst(colour(catch, SCUFF_SPECTRUM), scuff + scuff_db), s)
        add(out, burst(colour(catch, GRIT_SPECTRUM), grit + grit_db), s)
    return out


def sole_chirp(rough=0.32):
    """A rubber sole sticks and slips fast enough to give a short rough tone."""
    phase = 2 * np.pi * SOLE_HZ * np.arange(N) / SR + rough * walk(100)
    envelope = swell(SOLE_S, SOLE_LENGTH_S, SOLE_LENGTH_S, 0.13)
    return amp(SOLE_DB) * envelope * np.sqrt(2) * np.sin(phase)


def touches(events, modes, direct_db, crack_db, lowest_hz, echo_hz, t60, crack_s=0.016):
    """Small plastic things struck close by: no bass, least of all in the room; long contact is duller."""
    out, t = np.zeros((2, N)), np.arange(int(.5 * SR)) / SR
    for s, db, contact_s, pan_db in events:
        near = ring(modes, t) + amp(crack_db) * diffuse(len(t)) * fade(t, crack_s)
        echo = highpass(room(near[0], t60, direct_db=-np.inf), echo_hz)
        push = t * np.exp(-2 * t / max(contact_s, 1 / SR))
        hit = highpass(convolve(amp(direct_db) * near + echo, push), lowest_hz)
        add(out, amp(db) * pan(pan_db) * hit / np.abs(hit).max(), s)
    return out


def still_air():
    """Steady coloured noise from all round the garage."""
    return amp(AIR_DB) * unit(colour(diffuse(N), AIR_SPECTRUM))


def room(x, t60, direct_db):
    """The direct sound plus the garage's diffuse tail, drawn afresh for each sound."""
    t = np.arange(len(x)) / SR
    response = diffuse(len(x)) * fade(t, t60)
    response = response / np.sqrt(np.sum(response ** 2) / 2)
    response[:, 0] += amp(direct_db)
    return signal.fftconvolve(x[None], response, axes=1)[:, :len(x)]


def diffuse(size):
    """Noise from all directions at two ports: alike in the bass, unrelated in the treble."""
    padded = 2 * next_fast_len(size // 2 + 1, real=True)
    mid, side = rfft(rng.standard_normal((2, padded)))
    hz = np.arange(len(mid)) * SR / padded
    likeness = np.sinc(2 * hz * PORT_GAP_M / 343) * .95  # 343 m/s, speed of sound
    mid, side = mid * np.sqrt(1 + likeness), side * np.sqrt(1 - likeness)
    return unit(irfft([mid + side, mid - side])[:, :size])


def colour(x, points):
    """Causal minimum-phase filter whose gain follows (pitch_hz, level_db) points."""
    size = next_fast_len(2 * (x.shape[-1] // 2) + 4096, real=True) * 2
    hz, db = np.transpose(points)
    f = np.maximum(np.arange(size // 2 + 1) * SR / size, 1)
    cepstrum = irfft(np.log(amp(np.interp(np.log(f), np.log(hz), db))))
    cepstrum[1:size // 2] *= 2  # folding the cepstrum forward makes the filter causal
    cepstrum[size // 2 + 1:] = 0
    return irfft(rfft(x, size) * np.exp(rfft(cepstrum)))[..., :x.shape[-1]]


def highpass(x, hz):
    """Steep cut of everything below hz."""
    return signal.sosfilt(signal.butter(3, hz, "high", fs=SR, output="sos"), x)


def convolve(x, response):
    """Both channels through one response, cut to the input's length."""
    return signal.fftconvolve(x, response[None], axes=1)[:, :x.shape[1]]


def ring(modes, t):
    """Impulse response of a set of (pitch_hz, level_db, t60_s) modes."""
    return sum(amp(db) * fade(t, t60) * np.sin(2 * np.pi * hz * t) for hz, db, t60 in modes)


def fade(t, t60):
    """Exponential decay, 60 dB down after t60."""
    return np.exp(-np.log(1000) * t / t60)


def swell(s, attack_s, length_s, t60):
    """Envelope from time s: a straight rise, a hold, an exponential release length_s after s."""
    age = np.arange(N) / SR - s
    return np.clip(age / attack_s, 0, 1) * fade(np.maximum(age - length_s, 0), t60)


def walk(rate):
    """Smooth random wander with a spread near 1, about rate new values a second."""
    k = max(int(SR / rate), 1)
    steps = np.repeat(rng.standard_normal(N // k + 1), k)
    return unit(uniform_filter1d(steps, k)[:N])


def curves(table):
    """One curve over the whole scene for each column after the time."""
    s, *columns = np.transpose(table)
    return [np.interp(np.arange(N) / SR, s, c) for c in columns]


def burst(x, db):
    """Scale a blow so that its loudest 20 ms have the given level."""
    power = uniform_filter1d(np.mean(x, axis=0) ** 2, SR // 50)
    return x * amp(db) / np.sqrt(power.max())


def pan(db):
    """Gains of the two channels for a left-minus-right level."""
    return amp(np.array([[1], [-1]]) * db / 2)


def add(out, x, s):
    """Mix x into out from time s."""
    start = max(int(s * SR), 0)
    out[:, start:start + x.shape[-1]] += x[..., :N - start]


def amp(db):
    """Decibels to gain."""
    return 10 ** (np.asarray(db) / 20)


def unit(x):
    """Scale to rms 1."""
    return x / np.sqrt(np.mean(x ** 2))


def scene():
    """The opener and door overhead, the feet below, the small sounds in the hands, and still air."""
    door = motor() + start_up() + running() + grinding() + knocks() + slam()
    door += rattles() + squeaks() + ticks() + seal_rub()
    feet = shuffle() + sole_chirp()
    taps = touches(FINGER_TAPS, CASE_MODES, direct_db=22, crack_db=-14, lowest_hz=560, echo_hz=900, t60=.22)
    button = touches(BUTTON_CLICKS, REMOTE_MODES, direct_db=4.0, crack_db=4, lowest_hz=750,
                     echo_hz=1500, t60=0.25)
    return pan(curves(FACING_BALANCE)[0]) * door + feet + taps + button + still_air()


def record(dry):
    """Each microphone port adds its own colour; the phone cuts the deep bass and the top."""
    ports = []
    for x, side in zip(highpass(dry, 48.0), (1, -1)):
        ports.append(colour(x, [(hz, side * db / 2) for hz, db in PORT_COLOURS]))
    return signal.sosfilt(signal.ellip(10, .2, 80, TOP_HZ, fs=SR, output="sos"), ports)


dry = scene()
out = record(dry)
int16_out(out)
```